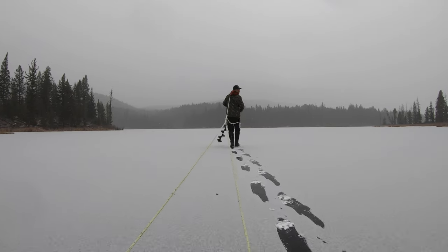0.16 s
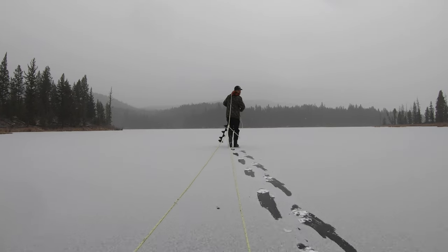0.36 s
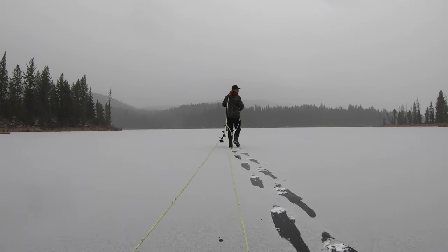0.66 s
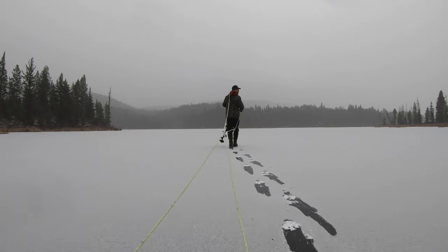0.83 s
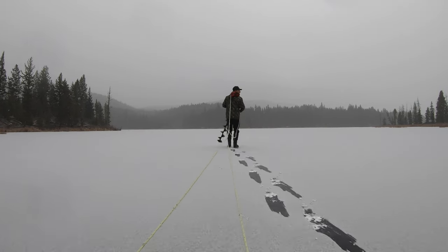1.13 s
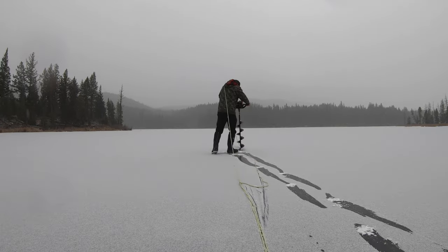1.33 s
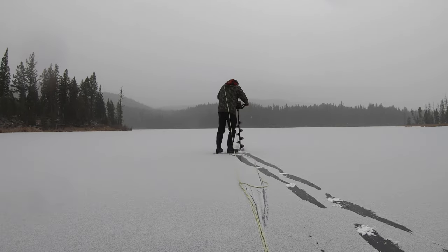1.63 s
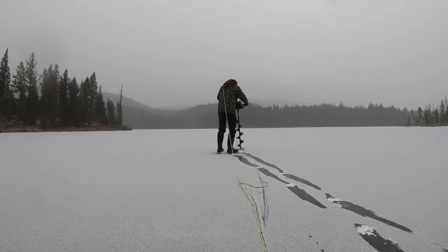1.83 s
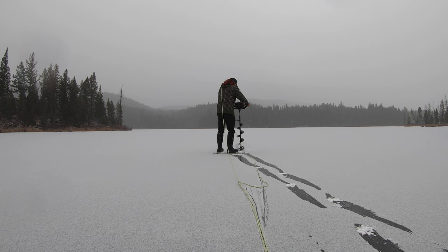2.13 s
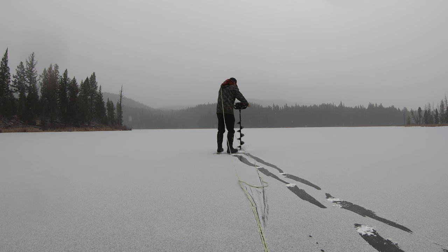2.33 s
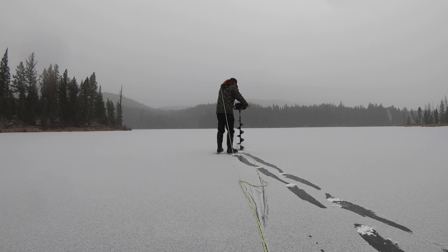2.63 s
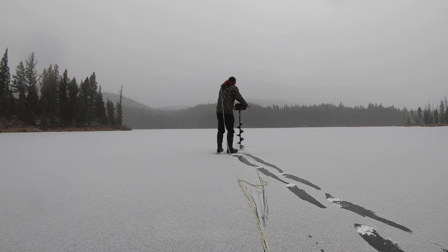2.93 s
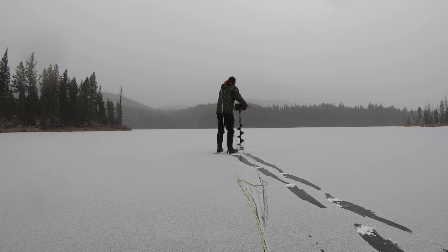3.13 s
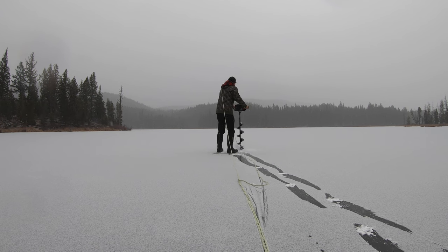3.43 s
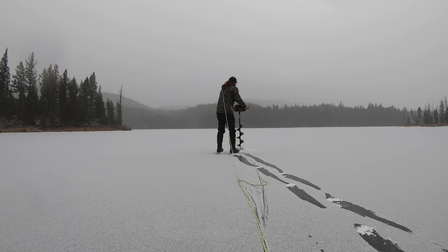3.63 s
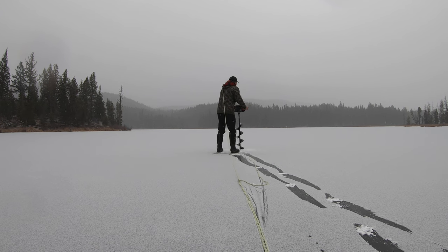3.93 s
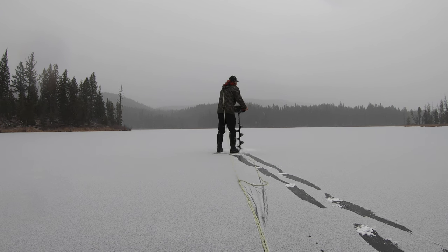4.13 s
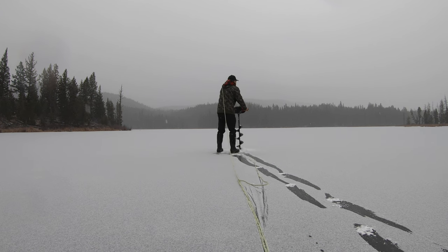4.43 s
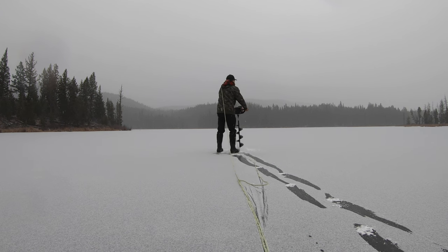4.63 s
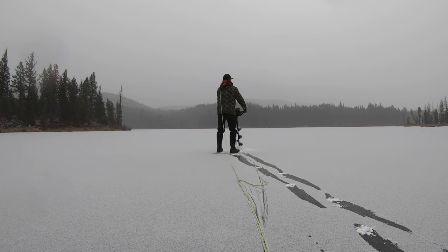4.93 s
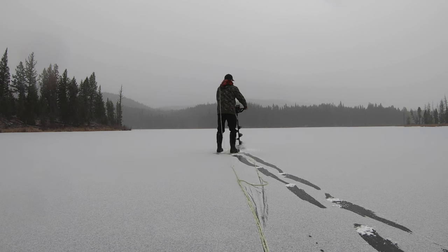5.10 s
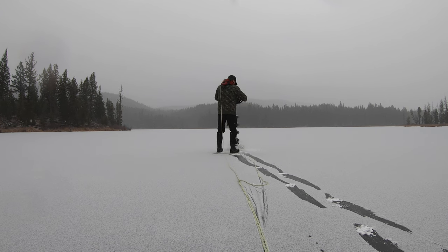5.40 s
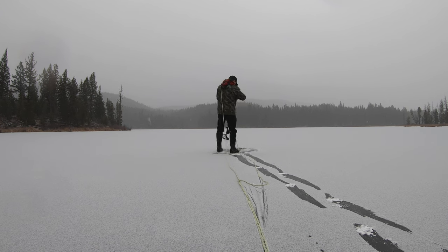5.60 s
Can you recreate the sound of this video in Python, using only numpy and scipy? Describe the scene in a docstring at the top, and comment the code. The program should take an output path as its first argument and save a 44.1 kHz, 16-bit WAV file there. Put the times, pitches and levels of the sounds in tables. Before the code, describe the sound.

On a frozen lake, microphones riding a sled catch its rumbling hull and the hiss of snow. Suddenly a powered auger takes over a few metres off, shaving ice in crackling, rhythmic scrapes with a light ring of steel and a soft rising whine. The ice booms as the hole deepens, then cracks and gives way. Small splashes and gurgles follow and die down.

```python
"""On a snowy lake, a close pair of microphones rides a towed sled: the hull drums, the snow hisses.
At 1.2 s the scene changes to a motor-driven auger boring the ice some metres from the microphones.
Its blades shave chips, scraping harder once a turn, over a gear whine. The deepening hole starts to
ring and the ice sheet booms. The last layer crunches, the bit breaks through near 4.8 s,
and slush slops, gulps and drains in the hole."""
import sys
import numpy as np
from scipy import signal
from scipy.fft import rfft, irfft
from scipy.io import wavfile
from scipy.ndimage import uniform_filter1d

SR = 44100
rng = np.random.default_rng(int(sys.argv[2]) if len(sys.argv) > 2 else 0)


def inscribe(sig):
    """Save sig as 16-bit PCM at rate SR to the path in sys.argv[1].

    A 1-D sig is mono; a 2-D sig holds one channel per row.
    Samples are clipped to [-1, 1] before scaling.
    """
    pcm = np.round(np.clip(np.atleast_2d(sig).T, -1, 1) * 32767)
    wavfile.write(sys.argv[1], SR, pcm.astype(np.int16))


N = 254016
TIME_S, BIN_HZ = np.arange(N) / SR, np.fft.rfftfreq(N, 1 / SR)
SCENE_CHANGE_S = 1.203
FIRM_BITE_DB = -30  # ordinary cutting

# Microphone pair, on the sled and facing the auger: freq_hz, coherence, left_lead_rad, left_over_right_db
MICS_ON_SLED = [(55, .6, -.3, -3), (90, .92, -.1, -2), (200, .9, -.1, -1.6), (280, .99, -.1, -.3),
                (400, .98, -.2, -.7), (675, .9, -.7, -2.3), (975, .45, -.2, -4), (1300, .6, -.4, -5.5),
                (1900, .43, .1, -8), (2400, .18, .4, -8), (4100, .27, 1.1, -3.5), (4700, .16, -2.1, -6),
                (6000, .54, -3.1, -8.4), (6800, .7, -3.7, -9), (8600, .68, -4.1, -9), (9300, .66, -5, -6),
                (10400, .6, -5.3, -10), (12600, .43, -6.5, -7.5), (14500, .38, -7.5, -9.5)]
MICS_ON_ICE = [(55, .95, 0, 0), (135, 1, 0, 0), (390, .995, -.1, .5), (675, .97, -.2, -1.2),
               (975, .93, -.1, -4), (1130, .91, .2, -3.6), (1300, .92, 0, -.8), (1550, .98, 0, -.2),
               (2350, .96, 0, -1.1), (2900, .99, 0, -.3), (4100, .95, .2, -1.2), (5400, .91, -.1, 1.9),
               (6100, .92, -.2, 1.3), (6800, .76, -.2, 1.8), (8000, .74, .4, .2), (8650, .55, 1.8, 3.4),
               (9150, .68, 3.2, 1.5), (9700, .64, 3.7, -5), (10400, .55, 5.2, -8.6), (11100, .52, 6.1, -7),
               (11900, .74, 6.2, -2), (12600, .66, 6.2, -.2), (13500, .25, 6.2, -3)]
# The camera's low-cut filter thins the bass below about 150 Hz during drilling: freq_hz, gain_db
LOW_CUT = [(25, -27), (60, -26), (120, -12.5), (155, -1)]
# Spectra of the noise sources: freq_hz, level_db
AIR_SPECTRUM = [(20, -2), (110, -9), (160, 8.5), (2000, -2), (15000, -42)]
HULL_SPECTRUM = [(15, -54), (25, -22), (54, -23), (113, -1.5), (436, -7.5), (488, -5), (794, -10.5),
                 (1320, -13), (1510, -17.5), (2300, -21.5), (3430, -32), (5000, -42), (6500, -63),
                 (11000, -120)]
SNOW_SPECTRUM = [(2060, -34), (3500, -10), (4870, -11.5), (6090, -9), (6520, -6.5), (8410, -1),
                 (9400, -3.5), (11500, -22), (14400, -24.5), (15500, -29)]
SHEET_SPECTRUM = [(25, -38), (60, -38), (110, -39), (160, -3), (300, 2), (450, 2), (900, -7.5), (3000, -65)]
SLUSH_SPECTRUM = [(300, -34), (700, -2), (1500, 2), (3500, -0.5), (5000, -13), (8000, -16.5), (9500, -27.5),
                  (15500, -41)]
SPLASH_SPECTRUM = [(500, -30), (1500, -29), (2500, -5.5), (3500, 0), (4500, -7.5), (7500, -9.5),
                   (9000, -17.5), (15500, -40)]  # chips flung off wet steel
THIN_ICE_SPECTRUM = [(200, -17), (500, -3.5), (1200, -1), (2200, -7.5), (3400, -3.5), (5000, -13),
                     (9000, -22), (15500, -55)]
CHIP_SPECTRUM = [(90, -42), (160, -14), (280, -16), (420, -35.5), (800, -15.5), (1080, -8), (1350, -10),
                 (1900, -5.5), (2450, -8), (3000, -1.5), (4900, -9.5), (8300, -20), (10500, -26.5),
                 (11300, -34.5), (12500, -34), (15000, -47), (15600, -66)]
# Gear whine as the motor runs: time_s, mesh_hz, level_db
GEAR_WHINE = [(1.25, 416, -65), (1.6, 461, -44), (1.7, 489, -49), (1.82, 519, -41.5), (1.95, 545, -42),
              (2.05, 549, -47), (2.12, 534, -47), (2.28, 549, -41), (2.42, 554, -45.5), (2.55, 549, -45),
              (2.8, 563, -52), (3.2, 599, -46), (3.6, 599, -48), (3.9, 601, -43), (4.4, 584, -48)]
# Harmonics of the gear mesh: multiple, level_db
MESH_HARMONICS = [(2, 0), (3, -1), (4, -14), (5, -5)]
# Knocks of the bit against the ice: peak_s, level_db
BIT_KNOCKS = [(1.665, -54), (4.83, -49), (5.07, -56)]
# Ice sheet and deepening hole, at firm bite: time_s, boom_db, ring_db
HOLE_LEVELS = [(1.21, -52, -61), (2.0, -56, -51.5), (2.6, -68, -48.5), (3.0, -77, -47.5), (3.5, -50.5, -43),
               (3.85, -52, -38.5), (4.0, -42, -38.5), (4.5, -32.5, -39), (4.72, -37.5, -34),
               (4.8, -33, -32.5), (4.86, -24, -39)]
# Modes of the dry hole: pitch_hz, width_hz, shallow_db, deep_db
DRY_HOLE_MODES = [(475, 60, -12, 7), (570, 70, 1, 2), (648, 55, 8, 7), (735, 40, 6, 4)]
# Modes of the hole full of slush: pitch_hz, width_hz, level_db
WET_HOLE_MODES = [(513, 940, -10), (764, 1050, 27), (1010, 200, -7)]
# Slush settling between slops: time_s, heave_db, gurgle_db, crunch_db
SETTLING = [(4.86, -32, -35.5, -49), (4.98, -50, -44, -62), (5.09, -40, -45, -58),
            (5.15, -38.5, -47.5, -55), (5.3, -38, -53, -70), (5.36, -62, -39.5, -45),
            (5.49, -67, -49.5, -40.5), (5.6, -65, -65, -45), (5.76, -84, -77, -51)]
# Slush falling off the flights: start_s, level_db, length_s, brightness_db, heave_db, gurgle_db
SLUSH_SLOPS = [(4.861, -59, 0.012, 19, -45, -43), (4.886, -60.5, 0.0087, 22, -47, -42),
               (4.902, -59, 0.0089, 17, -49, -42), (4.921, -57.5, 0.011, 16, -47, -35),
               (4.943, -52, 0.018, 14, -31, -39), (4.997, -45, 0.0084, 11, -45, -36),
               (5.022, -41, 0.0078, 6, -27.5, -49), (5.05, -52.5, .012, 11, -31, -43),
               (5.07, -41, 0.0094, 6.5, -43, -35), (5.101, -52.5, 0.065, 9, -38.5, -55),
               (5.133, -64, 0.011, 0, -49, -52), (5.211, -54, 0.026, 2, -42, -41),
               (5.268, -62.5, 0.035, 17, -51, -43), (5.45, -57, 0.023, -26, -68, -46),
               (5.522, -59, 0.0083, 0, -58, -64), (5.561, -52, 0.0083, -17, -64, -68),
               (5.67, -51, 0.019, -30, -79, -65)]
# Air pockets in the hole: start_s, level_db, start_hz, end_hz, length_s, fade_db, roughness
AIR_POCKETS = [(4.785, -29, 506, 490, 0.031, 1, 0.5), (4.825, -30, 276, 253, 0.048, -6, 0.4),
               (4.858, -47, 1480, 1400, 0.112, -9, 0.8), (4.943, -30.5, 589, 545, 0.036, -5, .6),
               (4.99, -36.5, 182, 161, 0.07, -3, 0.4), (5.029, -32, 212, 168, 0.039, -5, 0.65),
               (5.059, -33.5, 654, 686, 0.027, -4, .4), (5.09, -45, 1440, 1510, 0.16, -12, 1),
               (5.115, -38, 430, 480, 0.035, -3, .6), (5.223, -34, 695, 616, 0.06, -3, 0.8),
               (5.217, -41, 1040, 1000, 0.029, -6, 0.4), (5.182, -31, 292, 205, 0.073, -8, 0.2),
               (5.252, -36.5, 265, 292, 0.13, -23, 0.06), (5.325, -45, 1020, 970, 0.061, -6, .3),
               (5.444, -44, 690, 654, 0.056, -6, 0.2)]
# Cracks in the last layer of ice: peak_s, level_db, fall_s
THIN_ICE_CRACKS = [(4.223, -29, 0.013), (4.392, -25.5, 0.0086), (4.456, -26, 0.0097), (4.498, -26, 0.026),
                   (4.537, -28, .008), (4.6, -25.5, 0.0086), (4.62, -30.5, .008), (4.678, -28.5, 0.019),
                   (4.75, -36, .008), (4.77, -25, 0.0045), (4.793, -29, 0.0057), (4.802, -23, 0.0097),
                   (4.827, -25, .008), (4.846, -34, 0.0054)]
# The bit leans, strongly once a turn and weakly between: peak_s, scrape_db, pitch_hz, chip_swell
BIT_LEANS = [(1.58, -41, 1950, 1), (2.02, -37.5, 1850, 0.5), (2.16, -54, 1940, 3), (2.28, -36, 1880, 1.5),
             (2.42, -57, 1900, 1.5), (2.52, -35, 1950, 2), (2.68, -50, 2050, 2.5), (2.76, -31.5, 1970, 0),
             (2.921, -46, 1980, 1), (3.02, -28, 1860, 1.5), (3.18, -37, 2000, -1), (3.25, -29.5, 1916, 2),
             (3.391, -36, 1860, 0.5), (3.5, -29, 1860, 1), (3.63, -43, 1870, 1), (3.721, -28.5, 1810, 0),
             (3.97, -31.5, 1710, 0), (4.1, -34, 1780, 1.5), (4.249, -30.5, 1734, 1.5),
             (4.39, -32.5, 1720, 0.5), (4.52, -32, 1620, 0), (4.799, -29, 910, -3.5)]
# Blades eased off for a new grip, leaned on, then through: time_s, bite_db, steel_over_chips_db
BLADE_BITE = [(1.21, -26.5, -9), (1.33, -29.5, -1), (1.44, -30, -0.5), (1.5, -30.5, -9), (1.6, -29.5, 1),
              (1.7, -30.5, -4.5), (1.8, -36.5, -1), (1.96, -38, 2.5), (2.05, -31.5, -4.5),
              (2.14, -32.5, -2), (2.55, -31.5, -1.5), (2.75, -28.5, -2), (3.24, -26.5, -4.5),
              (3.73, -27.5, -2.5), (3.86, -28, -4), (4.1, -31.5, -2.5), (4.53, -31, -1.5),
              (4.75, -28.5, -2.5), (4.81, -27, 0), (4.86, -36, -9)]
# Modes of blades and shaft: pitch_hz, width_hz, level_db
STEEL_MODES = [(1008, 27, -10), (1068.5, 34, -5.5), (1158, 44, -15), (1716, 170, -6.5), (2030, 155, -4.5),
               (2490, 98, -3), (2757, 51, -4.5), (2842, 63, -1.5), (3030, 58, -3.5), (3115, 68, -2),
               (3190, 66, -3), (3390, 180, 0), (3775, 65, -7), (4058, 63, -6.5), (4294, 73, -8.5),
               (4560, 60, -10.5), (5610, 310, -9.5), (6140, 39, -10.5), (7200, 210, -9), (8100, 150, -10)]


def amp(db):
    """Decibels to gain."""
    return 10 ** (np.asarray(db) / 20)


def unit(x):
    """Scales to rms 1."""
    return x / np.sqrt(np.mean(x ** 2) + 1e-20)


def per_bin(points):
    """Spreads (freq_hz, value) points over the FFT bins on a log-frequency axis."""
    hz, value = np.transpose(points)
    return np.interp(np.log(BIN_HZ + 1), np.log(hz + 1), value)


def curves(rows):
    """Each column as a curve in time, and a soft gate that is open while the table lasts."""
    times, *columns = np.transpose(rows)
    gate = uniform_filter1d(1. * (TIME_S > times[0] - .01) * (TIME_S < times[-1] + .01), 200)
    return [np.interp(TIME_S, times, column) for column in columns], gate


def bump(peak_s, rise_s, fall_s):
    """A swell of height 1 with Gaussian sides."""
    t = TIME_S - peak_s
    return np.exp(-.5 * (t / np.where(t < 0, rise_s, fall_s)) ** 2)


def colour(x, spectrum):
    """Filters x by a spectrum, at rms 1."""
    return unit(irfft(rfft(x) * amp(per_bin(spectrum)), N))


def grit(per_s, spread_db, flicker_db, flicker_s):
    """Two draws of dense cracks of uneven size under one flickering pressure."""
    cracks = rng.standard_normal((2, N)) * (rng.random((2, N)) < per_s / SR)
    cracks *= amp(spread_db * np.minimum(rng.exponential(1, (2, N)), 3))
    span = round(flicker_s * SR)
    flicker = unit(uniform_filter1d(uniform_filter1d(rng.standard_normal(N), span), span))
    return unit(cracks * amp(flicker_db * flicker))


def clump(x, depth_db, bins, frames):
    """Chips of like size come in clumps: small patches of pitch and time stand out."""
    spectra = signal.stft(x, nperseg=512, noverlap=384)[2]
    patches = rng.standard_normal(spectra.shape[1:])
    patches = unit(uniform_filter1d(uniform_filter1d(patches, bins, 0), frames, 1))
    return unit(signal.istft(spectra * amp(depth_db * patches), nperseg=512, noverlap=384)[1][:, :N])


def resonate(x, hz, widths_hz):
    """Resonances in series, one per width, on a steady or gliding pitch, at rms 1."""
    carrier = np.exp(2j * np.pi * np.cumsum(hz * np.ones(x.shape[-1])) / SR)
    for width in widths_hz:
        pole = np.exp(-np.pi * width / SR)
        x = 2 * (carrier * signal.lfilter([1 - pole], [1, -pole], x / carrier)).real
    return unit(x)


def ring(x, modes):
    """Drives a set of modes, each with steep skirts."""
    body = 0
    for hz, width, db in modes:
        detune = 2j * (BIN_HZ - hz) / width
        body += amp(db) / np.sqrt(width) / (1 + detune) / (1 + detune / 3)
    return unit(irfft(rfft(x) * body, N))


def microphones(draws, table):
    """Both microphones hear the first draw, a phase step apart; the right also hears some of the second."""
    shared, separate = rfft(draws)
    coherence, lead, balance_db = (per_bin(np.array(table)[:, [0, k]]) for k in (1, 2, 3))
    tilt = amp(balance_db / 2)
    left = shared * tilt
    right = (coherence * shared * np.exp(-1j * lead) + np.sqrt(1 - coherence ** 2) * separate) / tilt
    mono_gain = np.sqrt(tilt ** 2 + tilt ** -2 + 2 * coherence * np.cos(lead)) / 2
    return irfft([left, right] / mono_gain, N)


def lean_swell():
    """A swell about zero that peaks at each lean of the bit."""
    return sum(bump(s, .036, .033) for s, *_ in BIT_LEANS) - .5


def slush_fill():
    """How far slush has filled the hole, 0-1."""
    return np.interp(TIME_S, [4.5, 5.3], [0, 1])


def lake_air():
    """Faint hush over the lake and one puff of wind, mostly on the left microphone."""
    buffet = unit(signal.sosfilt(signal.butter(4, 45, fs=SR, output="sos"), rng.standard_normal((2, N))))
    puff = amp([[-56], [-65]]) * buffet * bump(1.334, .035, .13)
    return puff + amp(-59.5) * colour(rng.standard_normal((2, N)), AIR_SPECTRUM)


def sled():
    """Right under the microphones, crust drums on the hull and fine snow hisses."""
    jolt_db = 1.8 * bump(1.17, .0069, .0069)
    rumble_db = -23 - TIME_S + jolt_db  # the ride eases off by 1 dB a second
    crust = grit(per_s=9000, spread_db=0, flicker_db=-.83, flicker_s=.014)
    grains = grit(per_s=30000, spread_db=2.5, flicker_db=-.1, flicker_s=.011)
    snow = colour(clump(grains, depth_db=2.5, bins=2, frames=6), SNOW_SPECTRUM)
    return amp(rumble_db) * colour(crust, HULL_SPECTRUM) + amp(-38) * snow


def gears():
    """Fuzzy, wavering multiples of the mesh rate, which climbs as the motor gains speed."""
    (mesh_hz, whine_db), running = curves(GEAR_WHINE)
    mesh_hz *= 1 + .003 * unit(uniform_filter1d(rng.standard_normal(N), 2500))
    noise = grit(per_s=8000, spread_db=1.5, flicker_db=.8, flicker_s=.043)
    phase = 2 * np.pi * np.cumsum(mesh_hz) / SR
    whine = 0
    for k, db in MESH_HARMONICS:
        fuzz = resonate(noise, k * mesh_hz, widths_hz=(13 * k, 30 * k))
        whine += amp(db) * (.55 * np.sin(k * phase) + .75 * fuzz)
    return running * amp(whine_db) * whine


def knocks(pitch_hz=70):
    """Each knock of the bit is one short low push through the ice sheet."""
    push = sum(amp(db) * bump(s, .0037, .0032) * np.cos(2 * np.pi * pitch_hz * (TIME_S - s))
               for s, db in BIT_KNOCKS)
    return np.array([push, push])


def water_drive(rise_s=.0072):
    """Gains of the water's heave and gurgle, which surge just after each slop."""
    (heave_db, gurgle_db, _), wet = curves(SETTLING)
    heave, gurgle = amp(heave_db), amp(gurgle_db)
    for s, _, length_s, _, slop_heave_db, slop_gurgle_db in SLUSH_SLOPS:
        surge = bump(s + rise_s, rise_s, length_s)
        heave += amp(slop_heave_db) * surge
        gurgle += amp(slop_gurgle_db) * surge
    return wet * heave, wet * gurgle


def hole():
    """The sheet booms and the hole rings, louder with depth; slush blurs the ring, water drives both."""
    (bite_db, _), _ = curves(BLADE_BITE)
    (boom_db, ring_db), boring = curves(HOLE_LEVELS)
    boom_db += .9 * (bite_db - FIRM_BITE_DB)
    ring_db += 1.23 * (bite_db - FIRM_BITE_DB) + 3.5 * lean_swell()
    heave, gurgle = water_drive()
    sheet = colour(grit(per_s=8000, spread_db=.9, flicker_db=1.1, flicker_s=.01), SHEET_SPECTRUM)
    lumps = grit(per_s=9000, spread_db=.9, flicker_db=1.4, flicker_s=.015)
    lumps = clump(lumps, depth_db=3.5, bins=1, frames=14)
    shallow = ring(lumps, [(hz, width, db) for hz, width, db, _ in DRY_HOLE_MODES])
    deep = ring(lumps, [(hz, width, db) for hz, width, _, db in DRY_HOLE_MODES])
    depth = np.interp(TIME_S, [3.46, 3.6], [0, 1])  # the lowest mode comes up
    dry_ring = (1 - depth) * shallow + depth * deep
    wetness = .2 + .38 * depth + .33 * slush_fill()
    tube = np.sqrt(1 - wetness) * dry_ring + np.sqrt(wetness) * ring(lumps, WET_HOLE_MODES)
    boom = sheet * np.maximum(boring * amp(boom_db), heave)
    return boom + tube * np.maximum(boring * amp(ring_db), gurgle)


def gulps(wet_grit):
    """Air pockets ring as water closes the hole, each a gliding tone mixed with churning noise."""
    out = np.zeros(N)
    for s, db, start_hz, end_hz, length_s, fade_db, roughness in AIR_POCKETS:
        start, n = round(s * SR), round(length_s * SR)
        part = slice(start, start + n)
        hz = np.linspace(start_hz, end_hz, n)
        tone = np.sqrt(2) * np.sin(2 * np.pi * np.cumsum(hz) / SR)
        churn = resonate(wet_grit[part], hz, widths_hz=(.091 * start_hz, .095 * start_hz))
        envelope = signal.windows.tukey(n, .5) * amp(db + fade_db * np.linspace(-.5, .5, n))
        out[part] += envelope * (np.sqrt(1 - roughness ** 2) * tone + roughness * churn)
    return out


def slush():
    """Wet crunch drains away under short bright slops and rough gulps."""
    (_, _, crunch_db), wet = curves(SETTLING)
    wet_grit = grit(per_s=11000, spread_db=-1, flicker_db=.8, flicker_s=.0074)
    wet_grit = clump(wet_grit, depth_db=2.5, bins=3, frames=4)
    crunch, splash = colour(wet_grit, SLUSH_SPECTRUM), colour(wet_grit, SPLASH_SPECTRUM)
    out = wet * amp(crunch_db) * crunch
    for s, db, length_s, bright_db, _, _ in SLUSH_SLOPS:
        out += amp(db) * bump(s + .0041, .0045, 1.17 * length_s) * (crunch + amp(bright_db) * splash)
    out[0] += gulps(wet_grit[0])  # the draw both microphones hear
    return out


def thin_ice():
    """The last layer gives under the bit in short, quick-starting crunches."""
    crunch = colour(grit(per_s=12000, spread_db=1.2, flicker_db=1, flicker_s=.003), THIN_ICE_SPECTRUM)
    return crunch * sum(amp(db) * bump(s, .0044, fall_s) for s, db, fall_s in THIN_ICE_CRACKS)


def scrapes():
    """A broad scrape swells whenever the bit leans into the harder side of the hole."""
    chips = grit(per_s=12000, spread_db=1.5, flicker_db=.7, flicker_s=.008)
    out = np.zeros((2, N))
    for s, db, hz, _ in BIT_LEANS:
        part = slice(round(s * SR) - 8000, round(s * SR) + 8000)
        scrape = resonate(chips[:, part], hz, widths_hz=(860, 980))
        out[:, part] += amp(db) * scrape * bump(s, .046, .041)[part]
    return out


def blades():
    """Ice chips crack off, rasp against the cutting edges and ring the steel."""
    (bite_db, steel_db), cutting = curves(BLADE_BITE)
    chips = grit(per_s=25000, spread_db=1.5, flicker_db=-.5, flicker_s=.0058)
    crackle = colour(clump(chips, depth_db=2, bins=2, frames=8), CHIP_SPECTRUM)
    rasp = resonate(crackle, hz=2930, widths_hz=(620, 620))
    swell = sum(size * bump(s, .09, .055) for s, _, _, size in BIT_LEANS) - 2  # builds up to each lean
    shaving = amp(.82 * swell) * crackle + amp(-10 + 3.9 * swell) * rasp
    strikes = grit(per_s=10000, spread_db=1.1, flicker_db=.7, flicker_s=.025)
    strikes = clump(strikes, depth_db=2.6, bins=2, frames=16)  # now one mode sings out, now another
    steel = amp(steel_db + 2.5 * lean_swell()) * ring(strikes, STEEL_MODES)
    # light cutting leaves finer, brighter chips; slush dulls them
    bright_db = 6 - .5 * (bite_db - FIRM_BITE_DB) - 1.5 * slush_fill()
    fizz = signal.sosfilt(signal.butter(2, 5500, "high", fs=SR, output="sos"), shaving)
    return cutting * amp(bite_db) * (shaving + steel + (amp(bright_db) - 1) * fizz)


def scene():
    """The ride heard from the sled, then at once the auger from some metres away."""
    auger = blades() + scrapes() + thin_ice() + hole() + gears() + slush()
    thinned_auger = irfft(rfft(auger) * amp(per_bin(LOW_CUT)), N)
    ride = microphones(sled(), MICS_ON_SLED)
    drilling = microphones(thinned_auger + knocks(), MICS_ON_ICE) + lake_air()
    changed = np.clip((TIME_S - SCENE_CHANGE_S) / .0048 + .5, 0, 1)
    return (1 - changed) * ride + changed * drilling


def record(dry):
    """The treble ends at about 15.4 kHz."""
    treble_edge = signal.firwin(1535, 15400, window=("kaiser", 11), fs=SR)
    return signal.oaconvolve(dry, treble_edge[None], "same")


dry = scene()
out = record(dry)
inscribe(out)
```